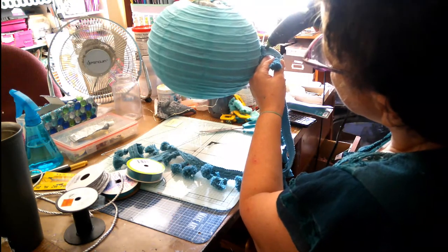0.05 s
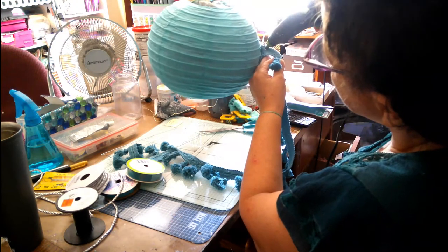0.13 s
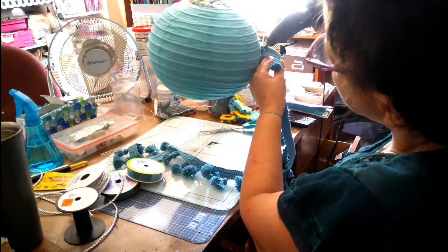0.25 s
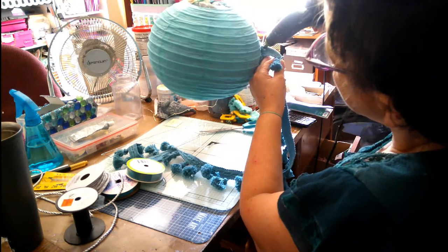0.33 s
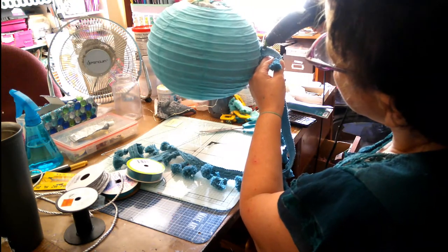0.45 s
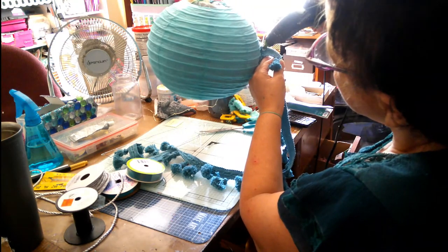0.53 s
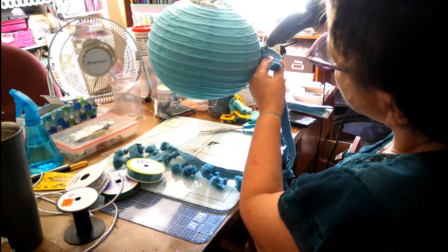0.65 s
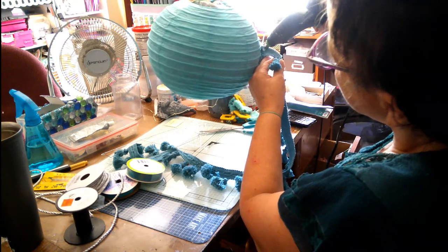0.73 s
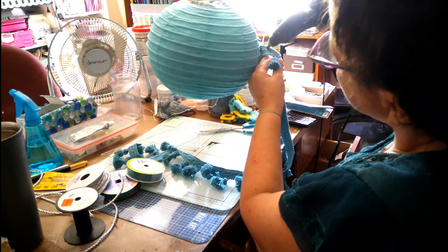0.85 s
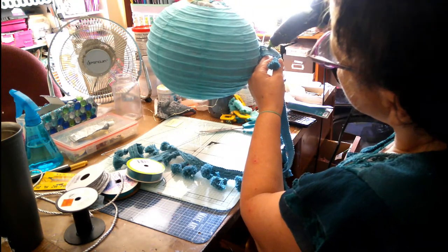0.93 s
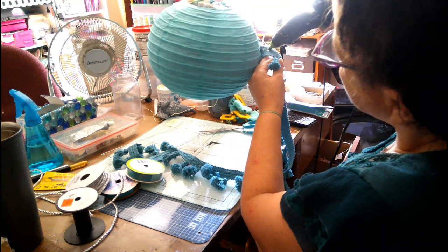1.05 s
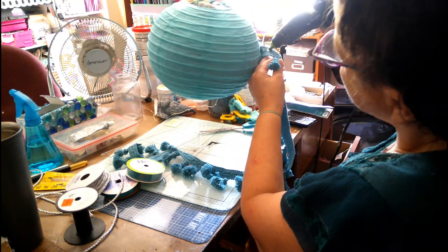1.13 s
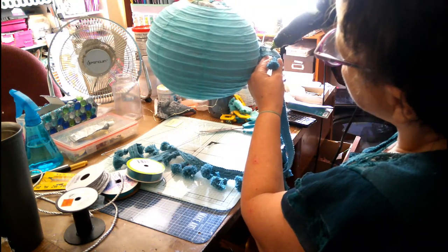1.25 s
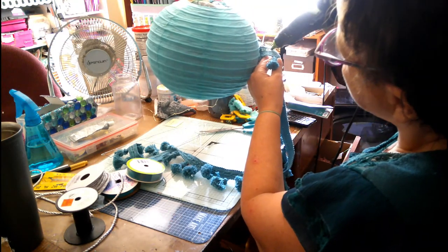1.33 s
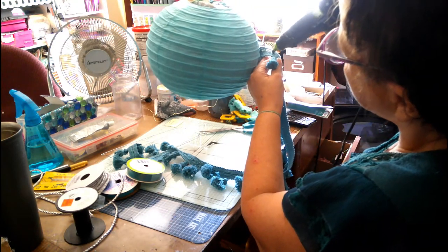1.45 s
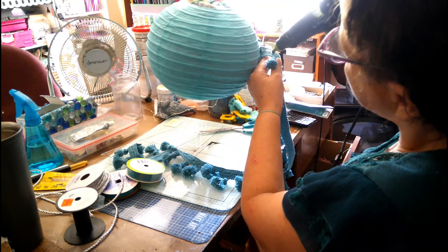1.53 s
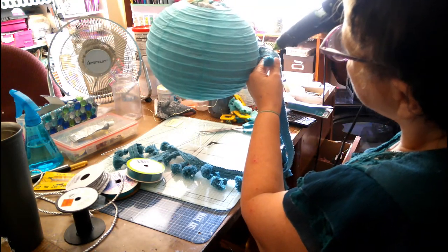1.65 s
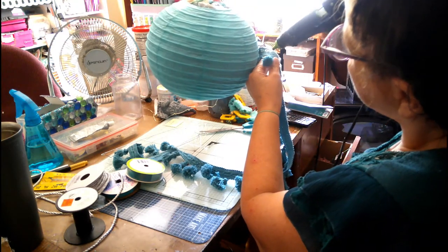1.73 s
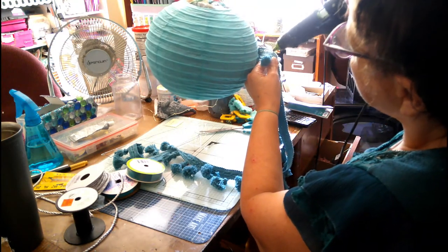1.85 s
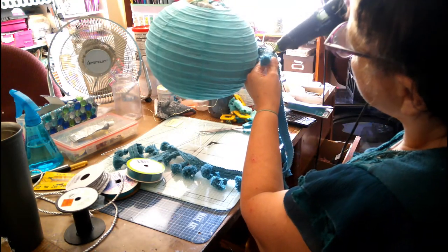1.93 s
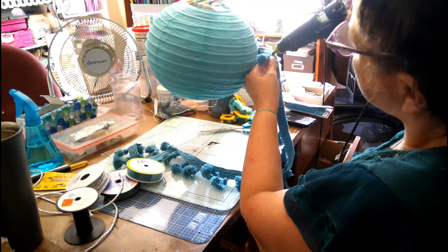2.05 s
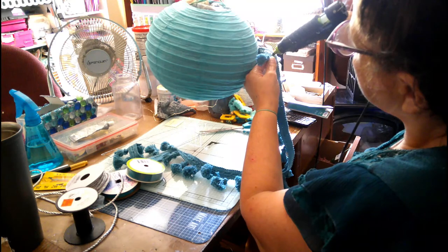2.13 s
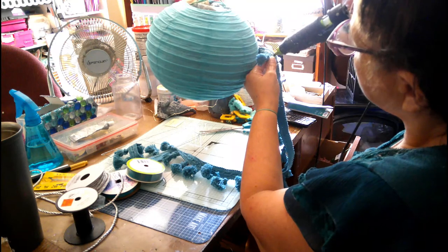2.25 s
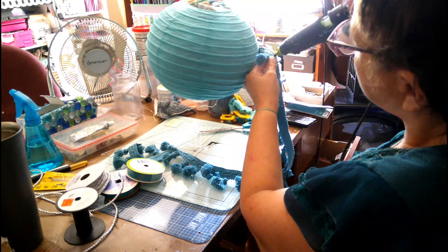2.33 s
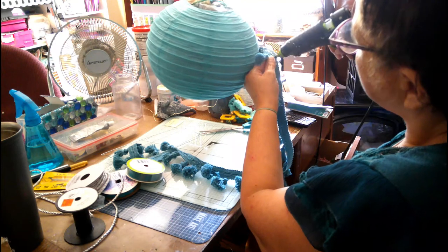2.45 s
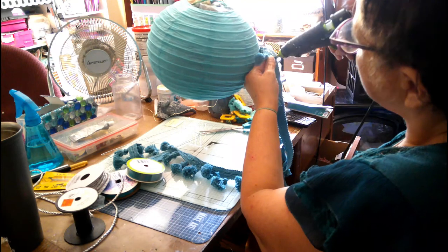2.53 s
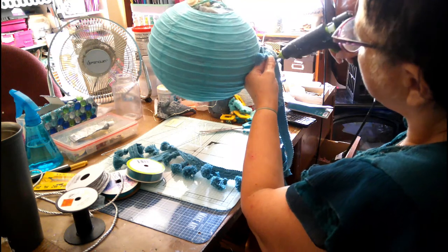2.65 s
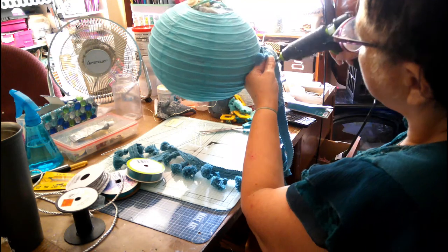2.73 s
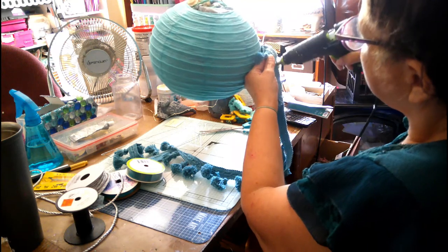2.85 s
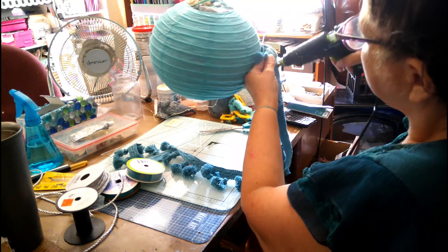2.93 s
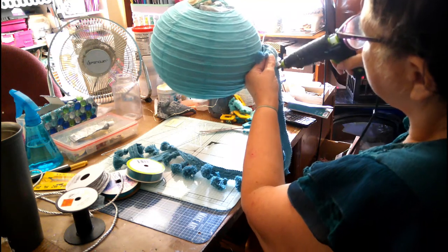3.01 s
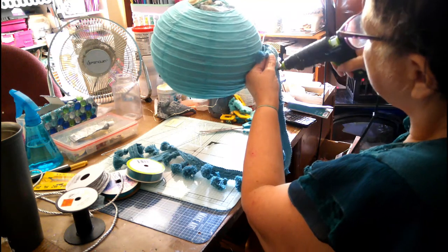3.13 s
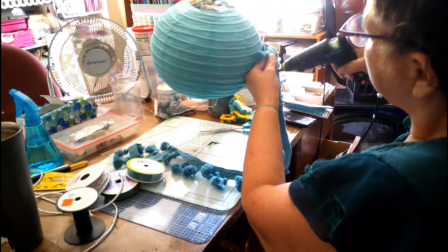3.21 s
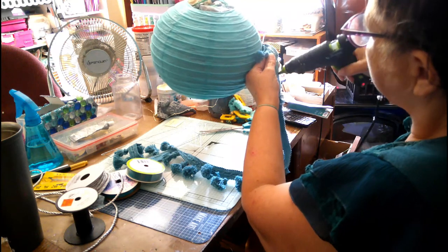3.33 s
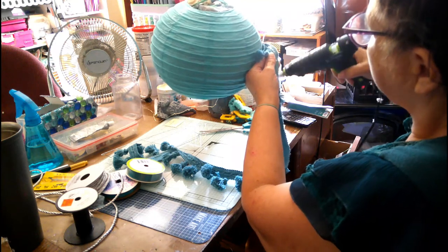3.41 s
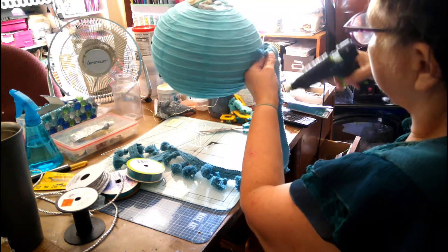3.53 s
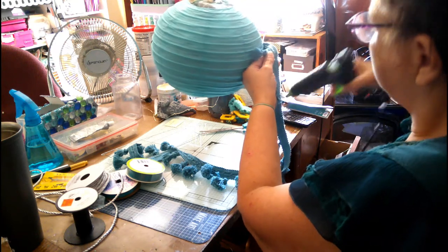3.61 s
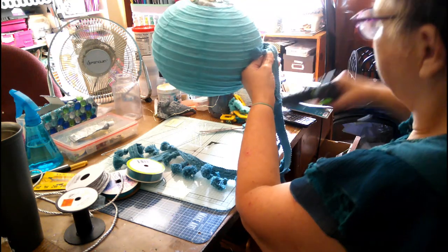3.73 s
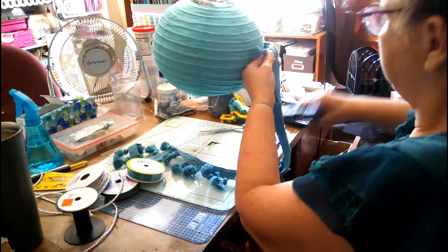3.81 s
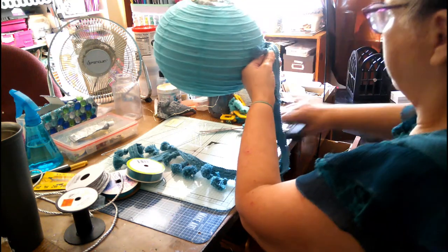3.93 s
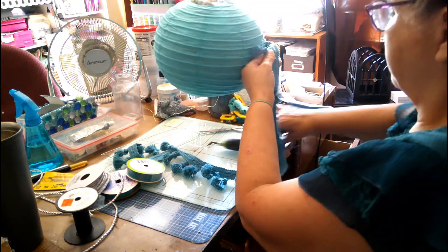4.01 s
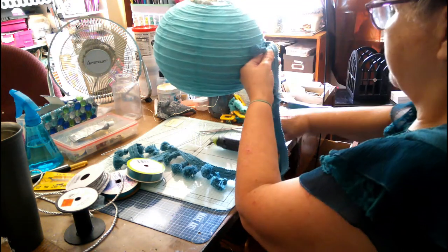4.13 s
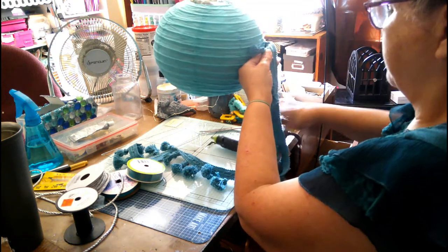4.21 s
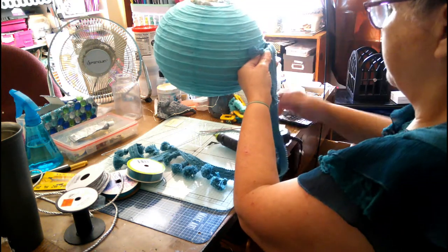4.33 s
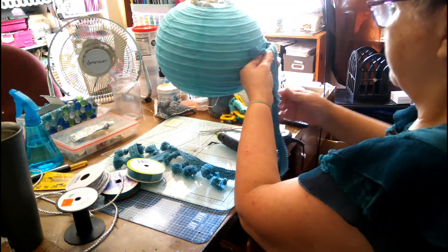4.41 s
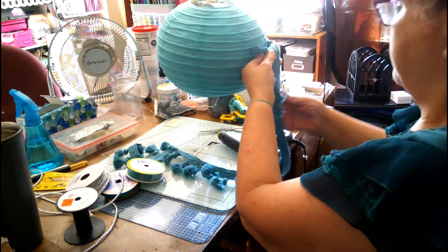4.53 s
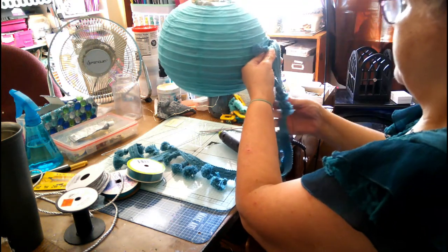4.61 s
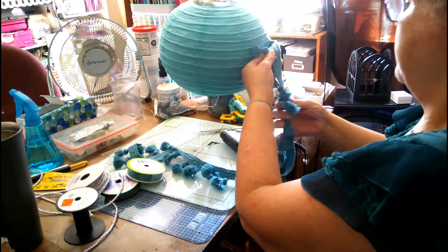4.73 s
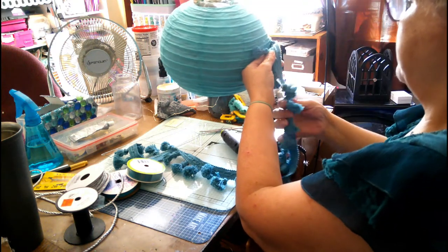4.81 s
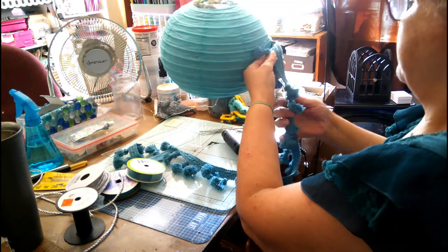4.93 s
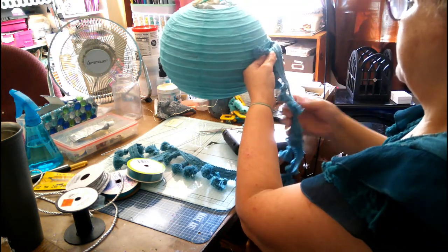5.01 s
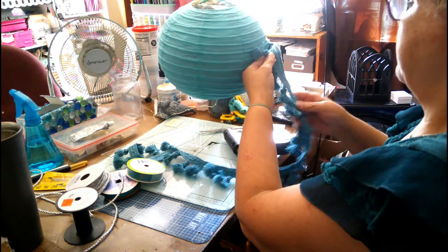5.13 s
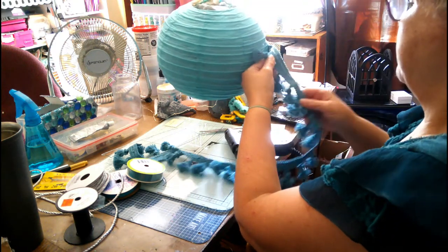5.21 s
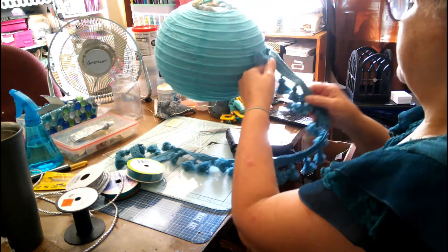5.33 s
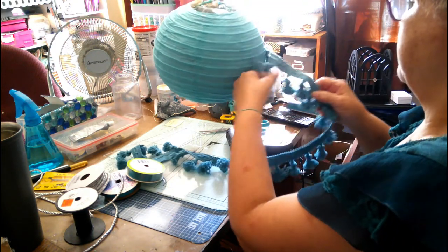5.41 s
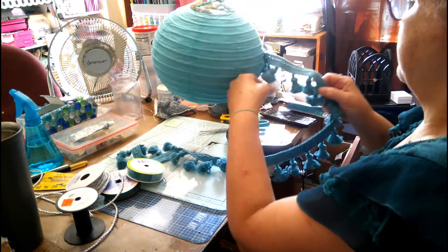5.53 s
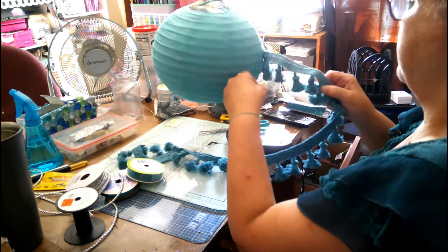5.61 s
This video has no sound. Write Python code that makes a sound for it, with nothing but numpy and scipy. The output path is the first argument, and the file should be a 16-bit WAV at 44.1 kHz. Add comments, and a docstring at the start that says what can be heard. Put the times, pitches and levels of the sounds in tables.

```python
"""A small desk fan runs on a craft table: a sum of mains harmonics gives its sharp-cornered hum.
Shaft and blade tones are multiples of a wandering shaft speed; filtered noise gives the rushing air.
A plastic glue gun is put down, knocks and bounces: each touch rings resonators and adds a noise crack.
A small room answers with a decaying noise tail, and two faint ticks are puffs of resonant noise."""
import sys
import numpy as np
from scipy import signal
from scipy.fft import rfft, irfft
from scipy.io import wavfile

SR = 44100
rng = np.random.default_rng(int(sys.argv[2]) if len(sys.argv) > 2 else 0)


def master_out(mix):
    """Clip the mix to full scale and print it as 16-bit PCM to the path in sys.argv[1]."""
    frames = np.transpose(np.atleast_2d(mix))
    ceiling = np.clip(frames, -1, 1)
    pcm = np.round(ceiling * 32767).astype(np.int16)
    wavfile.write(sys.argv[1], SR, pcm)


N = 249606
TIME = np.arange(N) / SR  # seconds

# Mains harmonics of the motor. Each row: multiple of the mains pitch, level in dB rms.
MAINS_HARMONICS = [(1, -31.8), (2, -56), (3, -48.8), (4, -64), (5, -55), (6, -69), (7, -62), (8, -75),
                   (9, -67), (10, -77), (11, -70)]
# Faint steady tones on thirds of the mains pitch. Each row: multiple of a third, level in dB rms.
MAINS_THIRDS = [(4, -76), (5, -69), (7, -67), (8, -73), (11, -69), (13, -73), (16, -74), (17, -77)]
# Shaft and blade tones. Each row: multiple of the shaft speed, level in dB rms before wavering,
# spread of the waver in dB.
BLADE_TONES = [(1, -65, 3), (2, -52.5, 1), (6, -56, 1), (12, -62, 2), (18, -58.5, 2.5), (24, -64, 2.5),
               (26, -68, 2.5), (30, -65.5, 2.5), (36, -72, 2.5), (42, -76, 2.5), (48, -72, 3)]
# Spectrum of the rushing air. Each row: frequency in Hz, relative level in dB per Hz.
AIR_SPECTRUM = [(8, -64.5), (20, -58.5), (42, -62.5), (64, -68), (78, -67), (110, -70), (330, -75),
                (450, -75.5), (620, -79), (900, -76), (1150, -80.5), (2600, -82), (3000, -89), (3500, -89),
                (4350, -110), (5000, -130)]
# Housing resonances excited by the air. Each row: frequency in Hz, width of one pass in Hz, level in dB rms.
HOUSING_MODES = [(423.6, 52, -61), (547.4, 58, -65), (882, 110, -65.5), (678, 45, -70.5)]
# Spectrum of the faint treble. Each row: frequency in Hz, relative level in dB per Hz.
HISS_SPECTRUM = [(3500, -19.5), (4400, -2.5), (5100, -2), (5700, 3), (8200, 0), (9500, -4.5), (10300, -6),
                 (11300, -21.5), (12000, -9), (12600, 0.5), (13400, -2), (14500, -3.5), (15600, -14.5)]
# Narrow and wider bands of treble noise. Each row: frequency in Hz, width of one pass in Hz, level in dB rms.
TREBLE_BANDS = [(2912, 5, -86), (5830, 8, -97), (6100, 130, -90), (6805, 10, -101), (7900, 500, -94),
                (9890, 100, -99)]
# Touches of glue gun on table. Each row: start in seconds, base ring level in dB, base crack level in dB,
# first and second favoured mode in Hz.
TOUCHES = [(3.980, -31.5, -42, 560, 1550), (3.986, -39.5, -39, 870, 870), (4.071, -41, -45, 330, 1960),
           (4.076, -38, -37, 1015, 2360), (4.106, -28, -28.5, 649, 1770), (4.112, -26.5, -43, 930, 1960),
           (4.131, -38, -43.5, 1015, 2620), (4.292, -41.5, -39.5, 480, 1130),
           (4.298, -39, -48.5, 405, 1960), (4.316, -49, -47, 1130, 2850)]
# Modes of the gun's body and the table top. Each row: frequency in Hz, 60 dB decay time in seconds.
BODY_MODES = [(95, .2), (200, .1), (330, .09), (405, .09), (480, .09), (560, .08), (640, .08), (685, .09),
              (780, .07), (870, .07), (1015, .09), (1130, .07), (1550, .06), (1770, .05), (1960, .05),
              (2360, .07), (2600, .06), (2850, .05), (3400, .05), (3800, .05)]
# Strength of the modes along frequency. Each row: frequency in Hz, gain in dB.
MODE_GAINS = [(95, -7.5), (200, -6.5), (330, -8), (600, -7.5), (1000, -3), (2000, 0), (2700, -23),
              (3800, -6)]
# Spectrum of the crack and the room tail. Each row: frequency in Hz, relative level in dB per Hz.
CRACK_SPECTRUM = [(150, -5.5), (400, -1), (1000, 0.5), (2000, 0.5), (2800, -6), (3100, -14), (3800, -15),
                  (4500, -42), (5500, -35.5), (7000, -47.5), (8500, -54), (10500, -45), (11500, -55),
                  (12300, -38), (13500, -34), (14600, -40), (15700, -57)]
# Faint ticks. Each row: start in seconds, noise level in dB before the resonance, centre in Hz.
TICK_PUFFS = [(1.186, -60, 4300), (5.629, -54, 2700)]

MAINS_HZ, SHAFT_HZ = 59.978, 15.5
OVERTONE_LAG = 1.2  # radians behind the corners of the wave
# A fainter hum beats with the second multiple, in step at this time.
SECOND_HUM_HZ, SECOND_HUM_DB, IN_STEP_S = 120.13, -62, 2.3
AIR_DB, HISS_DB = -50, -82  # rms
FAVOUR_DB, RING_CUT_HZ = 11.5, 4000
DULL_DB, DULL_HZ = 4, 1760  # rings lose DULL_DB at DULL_HZ, and more above
HEAVY_DB, TABLE_TOP_HZ = -29, 250  # blows lighter than HEAVY_DB hardly move the table top
CRACK_T60_S, CRACK_RISE_S = 0.19, 0.0004
CHATTER_HZ, CHATTER_DB = 200, 0.5  # the crack dies unevenly as loose parts chatter
SNAP_DB, SNAP_T60_S = 4.5, 0.025  # sharper start of the crack, against its level
ROOM_T60_S, ROOM_RISE_S, ROOM_DB = 0.25, 0.0081, -8.5  # level against the base ring level
CUTOFF_HZ = 15700


def amp(db):
    """Decibel law: level in dB to amplitude ratio."""
    return 10 ** (np.asarray(db) / 20)


def rms_one(x):
    """Normalisation to unit mean power."""
    return x / np.sqrt(np.mean(x ** 2) + 1e-20)


def drift(rate_hz):
    """Low-passed random fluctuation of spread 1, computed at every 40th sample and interpolated."""
    pole = np.exp(-80 * np.pi * rate_hz / SR)
    draws = rng.standard_normal(N // 40 + 2002)
    slow = signal.lfilter([1], [1, -2 * pole, pole * pole], draws)[2000:]  # drop the settling
    return np.interp(np.arange(N) / 40, np.arange(len(slow)), rms_one(slow - slow.mean()))


def coloured(spectrum):
    """Spectral shaping: white noise weighted in frequency, rms 1."""
    hz, level_db = np.transpose(spectrum)
    grid_hz = np.maximum(np.arange(N // 2 + 1) * SR / N, 1)
    gain = amp(np.interp(np.log(grid_hz), np.log(hz), level_db))
    return rms_one(irfft(rfft(rng.standard_normal(N)) * gain, N))


def resonate(x, hz, width_hz):
    """Damped oscillator: a two-pole resonance with gain 1 at its top."""
    r = np.exp(-np.pi * width_hz / SR)
    feedback = [1, -2 * r * np.cos(2 * np.pi * hz / SR), r * r]
    return signal.lfilter([(1 - r * r) / 2, 0, (r * r - 1) / 2], feedback, x)


def noise_bands(table):
    """Resonance under random excitation: white noise passes twice through each resonator."""
    total = np.zeros(N)
    for hz, width_hz, db in table:
        once = resonate(rng.standard_normal(N), hz, width_hz)
        total += amp(db) * rms_one(resonate(once, hz, width_hz))
    return total


def hum():
    """Fourier synthesis: overtones locked to the mains make a nearly triangular wave."""
    turn = 2 * np.pi * MAINS_HZ * TIME
    wave = np.zeros(N)
    for k, db in MAINS_HARMONICS:
        wave += amp(db) * np.cos(k * turn - OVERTONE_LAG * (k > 1))
    for k, db in MAINS_THIRDS:
        wave += amp(db) * np.cos(k * turn / 3 + rng.uniform(0, 2 * np.pi))
    slip = 2 * np.pi * (SECOND_HUM_HZ - 2 * MAINS_HZ) * (TIME - IN_STEP_S)
    second_hum = amp(SECOND_HUM_DB) * np.cos(2 * turn - OVERTONE_LAG + slip)
    return np.sqrt(2) * (wave + second_hum)  # rms to peak


def blades():
    """Rotational tones: multiples of a slightly wandering shaft speed, each wavering in strength."""
    turn = 2 * np.pi * SHAFT_HZ * np.cumsum(1 + 0.001 * drift(0.44)) / SR
    total = np.zeros(N)
    for k, db, waver_db in BLADE_TONES:
        level = np.sqrt(2) * amp(db + waver_db * drift(3.8))
        total += level * np.cos(k * turn + rng.uniform(0, 2 * np.pi))
    return total


def air():
    """Broadband flow noise: a rush throbbing faintly at the shaft rate, with resonances and hiss."""
    throb_db = 0.22 * np.cos(2 * np.pi * SHAFT_HZ * TIME) + 0.43 * drift(8.8)
    rush = amp(AIR_DB + throb_db) * coloured(AIR_SPECTRUM)
    hiss = amp(HISS_DB) * coloured(HISS_SPECTRUM)
    return rush + noise_bands(HOUSING_MODES) + hiss + noise_bands(TREBLE_BANDS)


def body_ring(since, ring_db, favoured_hz):
    """Modal excitation: a click and short rattle ring the modes, some picked by the contact point."""
    rattle = 0.045 * amp(-60 * since / 0.025) * rng.standard_normal(len(since))
    rattle[0] = 1  # the click
    gain_hz, gain_db = np.transpose(MODE_GAINS)
    total = np.zeros(len(since))
    for k, (hz, t60_s) in enumerate(BODY_MODES):
        ring = resonate(rattle, hz, np.log(1000) / np.pi / t60_s)
        favour = sum(np.exp(-(np.log2(hz / f) / 0.08) ** 2) for f in favoured_hz)
        level_db = ring_db + np.interp(np.log(hz), np.log(gain_hz), gain_db)
        level_db += FAVOUR_DB * favour
        level_db -= DULL_DB * np.log2(1 + (hz / DULL_HZ) ** 2)
        level_db += 1.5 * (ring_db - HEAVY_DB) * (hz < TABLE_TOP_HZ)
        total += amp(level_db) * (-1) ** k * ring / np.abs(ring).max()  # signs alternate
    return total


def crack_power(since, crack_db):
    """Two-stage decay: powers of a slower crack and a sharp snap add, after a brief rise."""
    crack = amp(crack_db - 60 * since / CRACK_T60_S) ** 2
    snap = amp(crack_db + SNAP_DB - 60 * since / SNAP_T60_S) ** 2
    return (crack + snap) * np.minimum(since / CRACK_RISE_S, 1) ** 2


def room_power(since, ring_db):
    """Reverberant decay: the power of the room tail builds briefly, then dies exponentially."""
    decay = amp(ring_db + ROOM_DB - 60 * since / ROOM_T60_S)
    return (decay * np.minimum(since / ROOM_RISE_S, 1)) ** 2


def knocks():
    """Impact radiation: each blow rings the modes and gives a broad crack with a room tail."""
    rings, cracks, tail = np.zeros(N), np.zeros(N), np.zeros(N)
    since = np.arange(SR // 2) / SR  # seconds after the touch
    noise = coloured(CRACK_SPECTRUM)
    bright = signal.sosfilt(signal.butter(2, 2200, "high", fs=SR, output="sos"), noise)
    chatter = amp(CHATTER_DB * drift(CHATTER_HZ))
    for start_s, ring_db, crack_db, first_hz, second_hz in TOUCHES:
        start = round(start_s * SR)
        span = slice(start, start + len(since))
        rings[span] += body_ring(since, ring_db, (first_hz, second_hz))
        cracks[span] += crack_power(since, crack_db)
        tail[span] += room_power(since, ring_db)
    # A low-pass keeps the rings below about 4 kHz.
    ring_cut = signal.cheby2(8, 50, 1.2 * RING_CUT_HZ, fs=SR, output="sos")
    rings = signal.sosfilt(ring_cut, rings + 1e-18)
    crack_sound = chatter * np.sqrt(cracks) * (0.91 * bright + 1.09 * noise)
    return rings + crack_sound + np.sqrt(tail) * noise


def ticks():
    """Transient excitation: short decaying puffs of noise pass through a broad resonance."""
    noise = rng.standard_normal(N)
    total = np.zeros(N)
    for start_s, db, hz in TICK_PUFFS:
        decay = amp(db - 60 * np.maximum(TIME - start_s, 0) / 0.025)
        puff = decay * (TIME >= start_s) * noise
        total += resonate(puff + 1e-18, hz, hz / 2)
    return total


def scene():
    """Superposition: the pressures of all sources add in one channel."""
    return (hum() + blades() + air() + knocks() + ticks())[None]


def record(dry):
    """Band limitation: an elliptic low-pass cuts the top steeply."""
    return signal.sosfilt(signal.ellip(11, 0.2, 60, CUTOFF_HZ, fs=SR, output="sos"), dry)


dry = scene()
out = record(dry)
master_out(out)
```